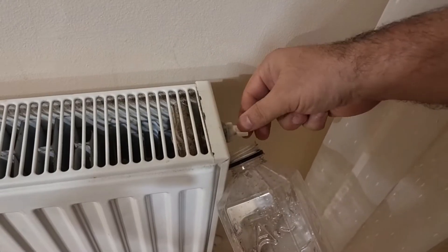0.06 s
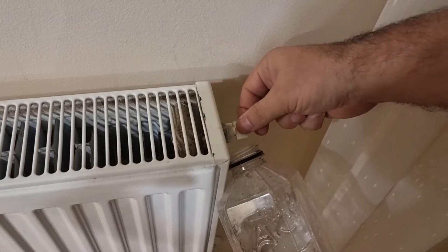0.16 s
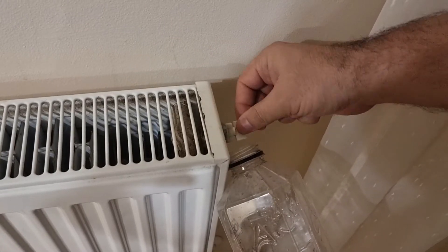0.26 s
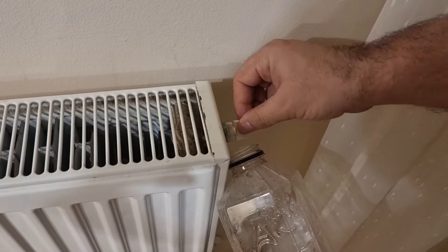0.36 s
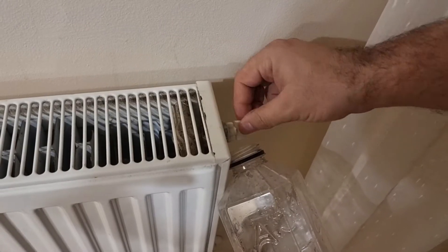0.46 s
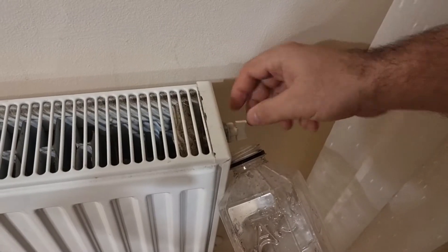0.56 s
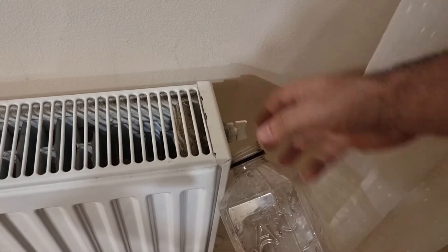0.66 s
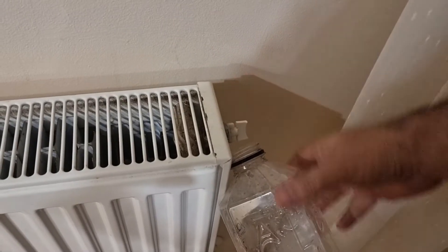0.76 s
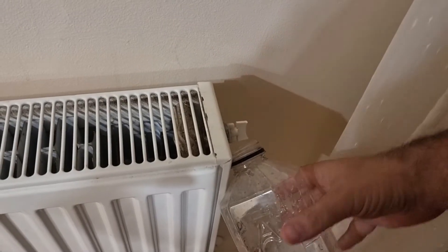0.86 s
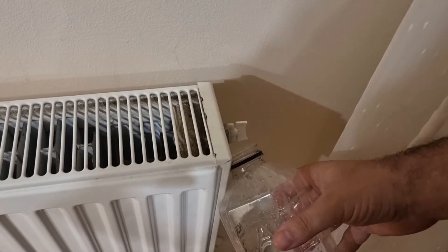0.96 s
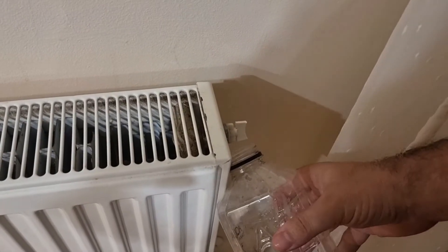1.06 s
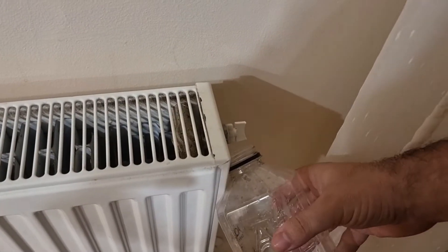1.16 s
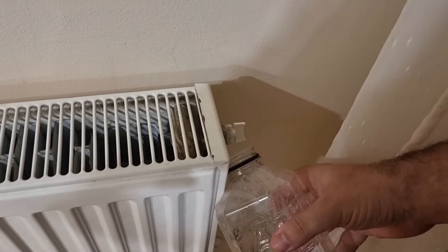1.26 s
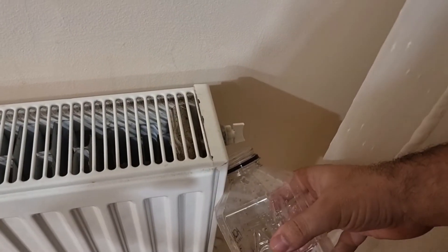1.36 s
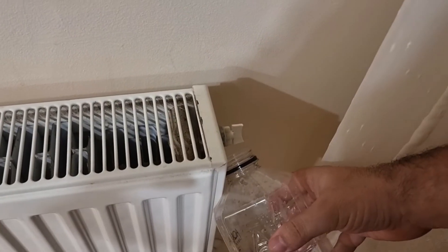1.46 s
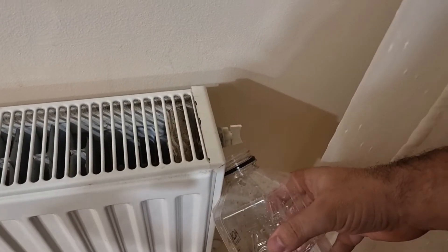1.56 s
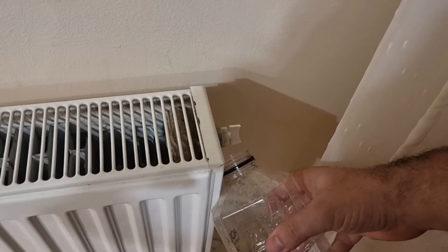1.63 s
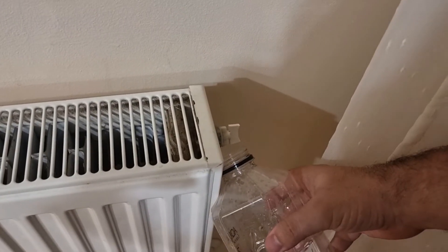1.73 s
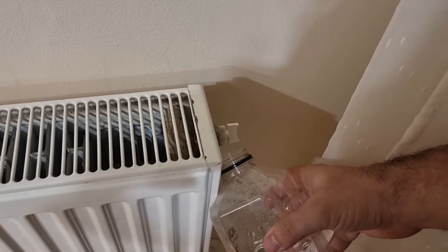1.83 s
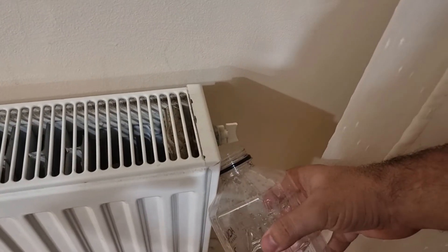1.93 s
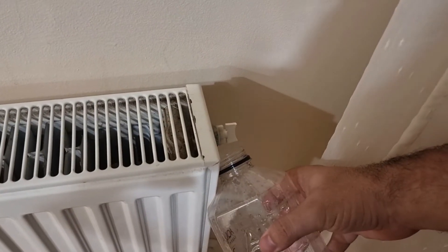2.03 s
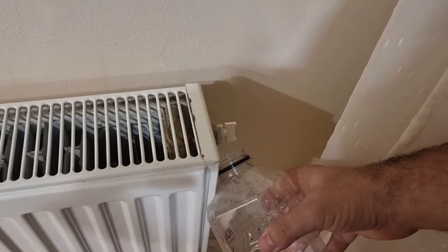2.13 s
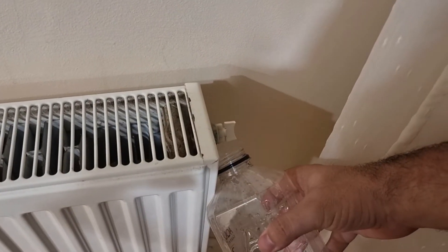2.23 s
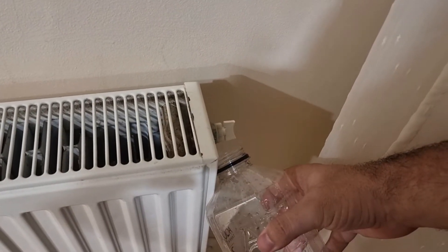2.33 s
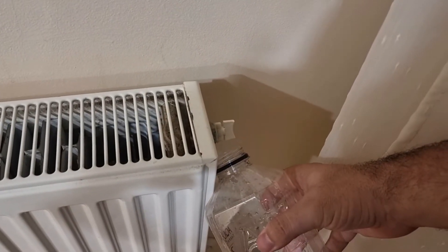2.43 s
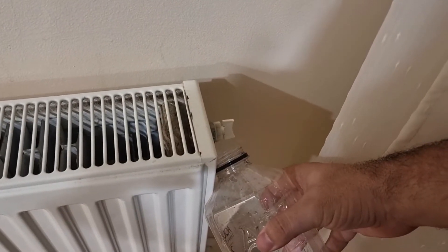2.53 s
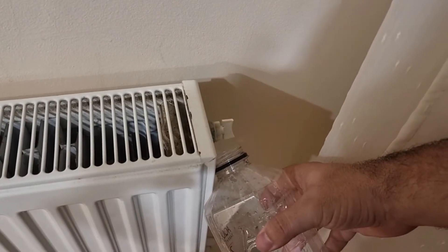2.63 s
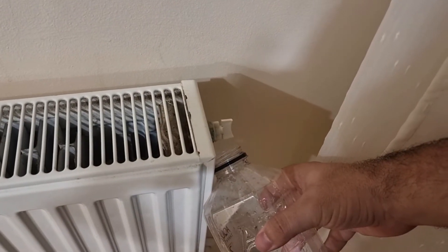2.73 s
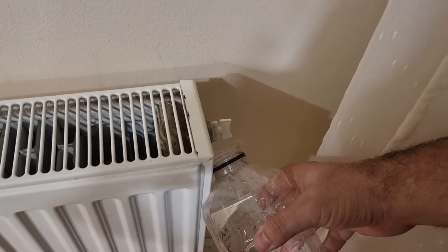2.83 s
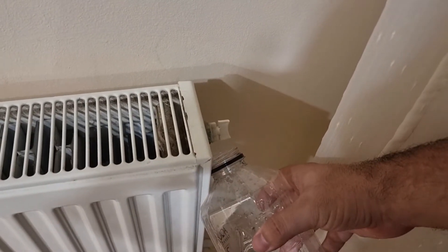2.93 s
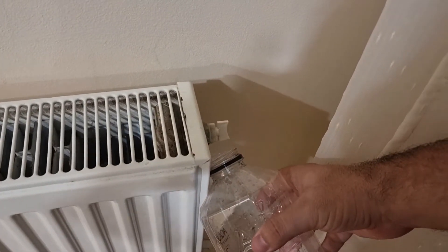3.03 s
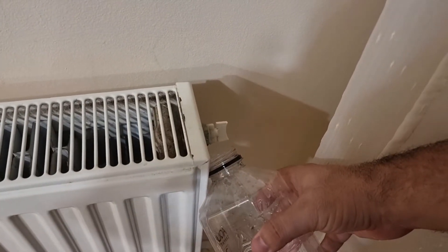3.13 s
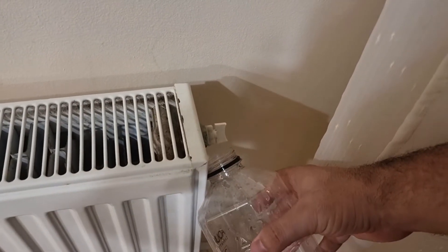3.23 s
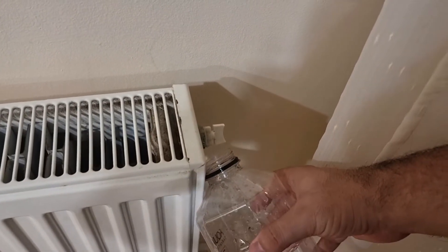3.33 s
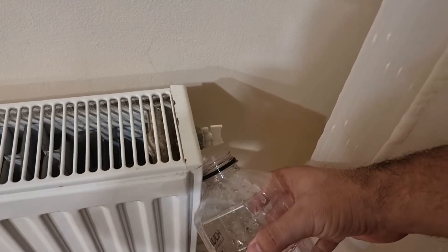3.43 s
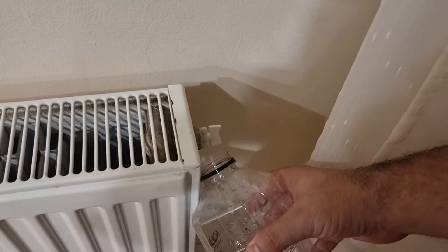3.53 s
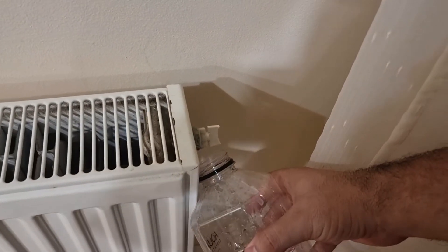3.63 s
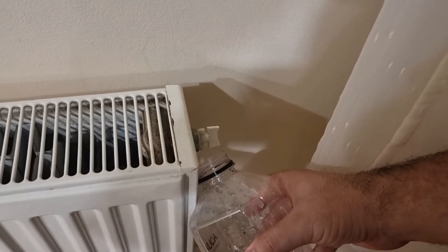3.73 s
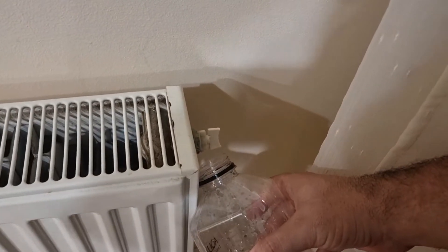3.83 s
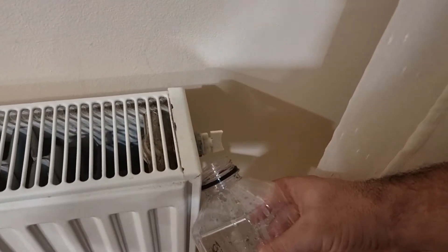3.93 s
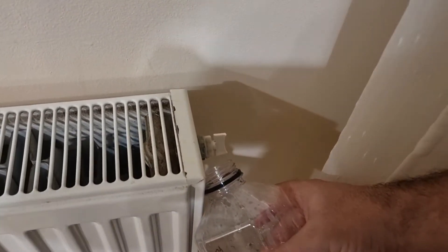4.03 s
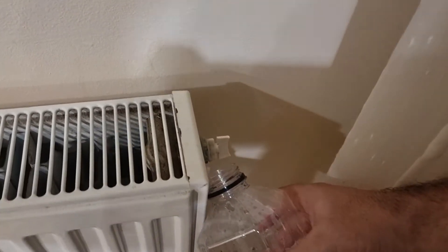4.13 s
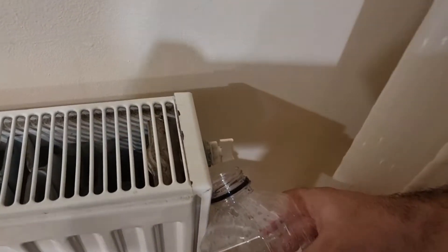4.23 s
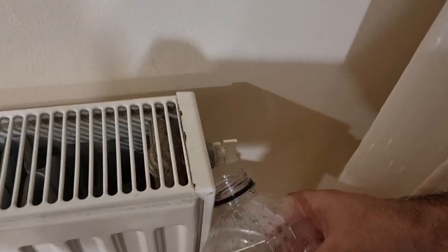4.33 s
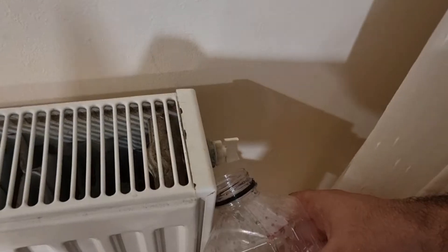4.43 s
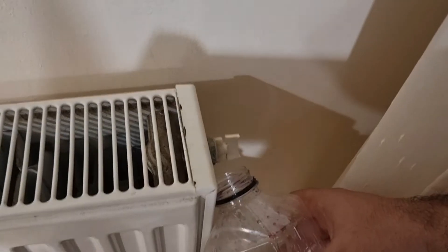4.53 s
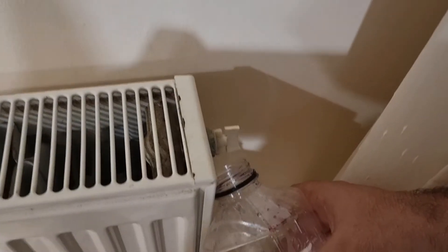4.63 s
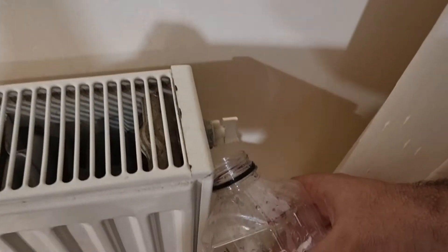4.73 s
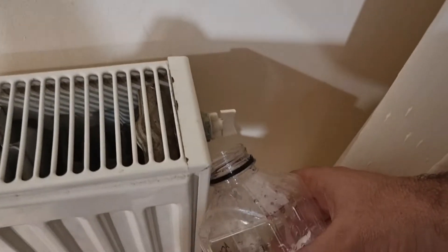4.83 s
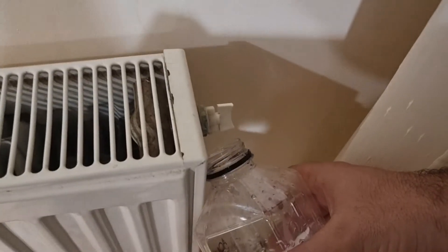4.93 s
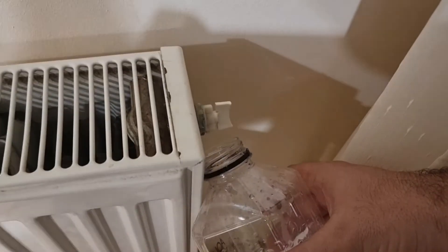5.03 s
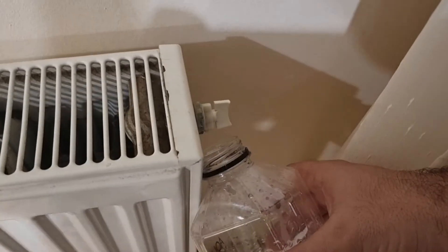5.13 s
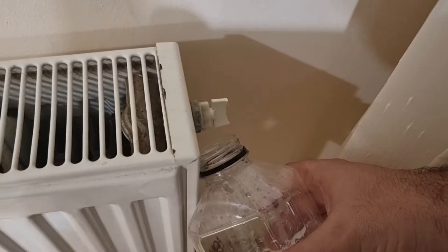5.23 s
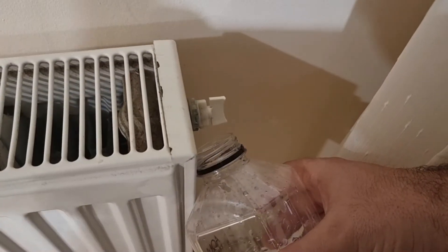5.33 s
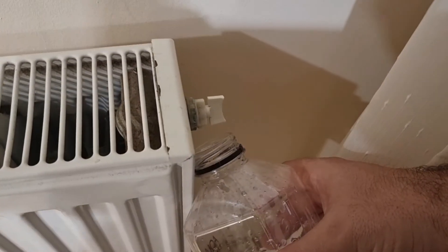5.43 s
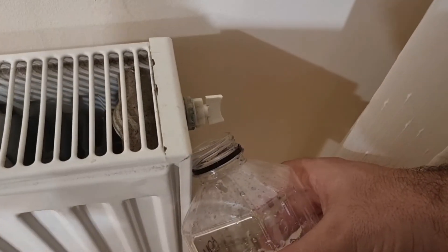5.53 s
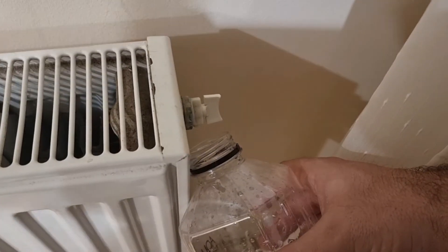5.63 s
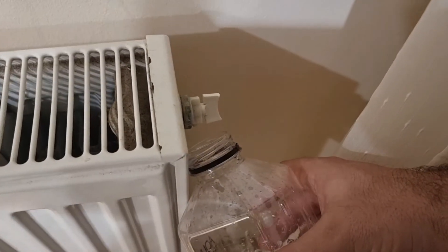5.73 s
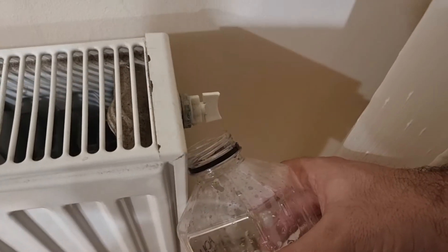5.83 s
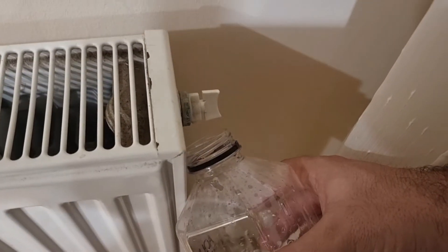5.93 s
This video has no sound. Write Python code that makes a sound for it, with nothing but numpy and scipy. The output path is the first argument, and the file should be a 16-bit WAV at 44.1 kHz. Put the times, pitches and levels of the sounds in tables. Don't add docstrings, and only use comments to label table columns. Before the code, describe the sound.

A bright, uneven hiss of escaping air beside a radiator, with brief hollow plastic knocks near one second and soft handling creaks.

```python
import sys
import numpy as np
from scipy import signal
from scipy.fft import rfft, irfft, next_fast_len
from scipy.io import wavfile

SR = 44100
rng = np.random.default_rng(int(sys.argv[2]) if len(sys.argv) > 2 else 0)


def inscribe(sig):
    pcm = np.round(np.clip(np.atleast_2d(sig).T, -1, 1) * 32767)
    wavfile.write(sys.argv[1], SR, pcm.astype(np.int16))


def level_to_linear(level):
    exponent = np.asarray(level, float) / 20
    return 10 ** exponent


N = 263718
SIZE = next_fast_len(N)
HZ = np.maximum(np.arange(SIZE // 2 + 1) * SR / SIZE, 1)


def rms_one(x):
    return x / np.sqrt(np.mean(x ** 2, axis=-1, keepdims=True) + 1e-20)


def in_time(rows, outside=None):
    s, *columns = np.transpose(rows)
    return [np.interp(np.arange(N) / SR, s, c, outside, outside) for c in columns]


def at_hz(points, axis=1):
    points = np.array(points)
    return np.interp(np.log(HZ), np.log(np.maximum(points[:, 0], 1)), points[:, axis])


def white(count):
    return rfft(rng.standard_normal((count, SIZE)))


def drift(rate):
    r = np.exp(-80 * np.pi * rate / SR)
    noise = rng.standard_normal(N // 40 + 2002)
    slow = signal.lfilter([1], [1, -2 * r, r * r], noise)[2000:]
    return np.interp(np.arange(N) / 40, np.arange(len(slow)), rms_one(slow))


def ring(hz, t60, length):
    t = np.arange(length) / SR
    return np.sin(2 * np.pi * hz * t) * level_to_linear(-60 * t / t60)


def add(out, sound, s):
    at = round(s * SR)
    out[..., at:at + sound.shape[-1]] += sound[..., :N - at]


def lean(left_over_right_db):
    return level_to_linear([[left_over_right_db / 2], [-left_over_right_db / 2]])


def scattered(source, t60, count=12):
    hold, t = N // count + 1, np.arange(SR // 5) / SR
    tails = rng.standard_normal((count + 2, 2, len(t))) * level_to_linear(-60 * t / t60)
    tails = rms_one(tails) / np.sqrt(len(t))
    fade = np.sin(np.pi * np.arange(2 * hold) / (2 * hold))
    out = np.zeros((2, SIZE + 3 * hold + len(t)))
    source = np.tile(source, 2)
    for k, tail in enumerate(tails[:count + 1]):
        piece = source[k * hold:(k + 2) * hold] * fade
        add_at = slice(k * hold, (k + 2) * hold + len(t) - 1)
        out[:, add_at] += signal.fftconvolve(piece[None], tail, axes=1)
    return rfft(out[:, hold:hold + SIZE]), rfft(source[hold:hold + SIZE])


def panel_comb():
    # (centre [Hz], half width [Hz], delay [ms], strength [-1..1])
    panel_echoes = [(4358, 571, 2.322, 0.52), (6194, 336, 2.31, -0.4), (8240, 893, 2.327, 0.37),
                    (13001, 200, 4.603, -0.25)]
    comb = np.ones(len(HZ))
    for hz, half_width, ms, strength in panel_echoes:
        reach = ((HZ - hz) / half_width) ** 2
        comb = comb * abs(1 - strength * np.exp(-reach - 2j * np.pi * HZ * ms / 1000))
    return comb


def jet_levels():
    # (time [s], level [dB])
    aim = [(0, 0.5), (.3, 1.5), (.83, 2), (.88, -2.5), (1.0, 2), (1.35, 1.5), (1.65, -1), (1.9, 0),
           (2.42, 2.5), (2.6, -0.5), (3.16, -0.5), (3.5, 1.5), (3.9, -2.5), (4.2, 0), (4.75, 1), (5.2, 0.5),
           (5.98, 2)]
    aim_share = [0.067, 0.05, 0.36, 1.0]
    key_turn_s = (.33, .42)
    key_turn_db = [-1.5, -3.5, -2, -0.2]
    (aim_db,) = in_time(aim)
    before = np.interp(np.arange(N) / SR, key_turn_s, [1, 0])
    return [level_to_linear(felt * aim_db + db * before + 1.0 * drift(7.0))
            for felt, db in zip(aim_share, key_turn_db)]


def jet(skirt_db=-19.5, depth=0.96, blur=0.16):
    jet_edges_hz = [1000, 3400, 7600, 11500, 17000]
    # (from [s], to [s])
    moves = [
        (1.0, 1.62),
        (2.32, 2.68),
        (4.0, 4.41),
    ]
    # (frequency [Hz], left [dB per Hz], right [dB per Hz])
    colour = [
        [(1560, -88, -87.5), (2030, -74.5, -81), (4170, -63.5, -59.5), (6560, -76.5, -70), (7700, -90.5, -83),
         (10850, -75, -73), (13100, -71.5, -64), (15700, -61.5, -70)],
        [(1520, -95.5, -90), (2050, -81.5, -84.5), (3820, -74, -71), (6520, -78, -67.5), (7560, -84, -78.5),
         (10800, -81, -79), (12850, -69, -58.5), (15700, -64, -72)],
        [(1500, -93.5, -87.5), (2060, -86.5, -89), (3920, -69, -67.5), (6640, -76, -66.5), (7600, -87.5, -82),
         (10500, -84, -82.5), (12900, -71.5, -62.5), (15700, -67, -73)],
        [(1520, -97, -88.2), (2030, -82, -86.2), (4210, -73, -64), (6420, -75.5, -71.5), (8000, -83.6, -79.5),
         (10800, -82, -85), (13240, -80, -85), (15800, -70, -76.6)],
    ]
    # (centre [Hz], width [Hz], boost or cut [dB])
    fin_rings = [
        [(2380, 520, -6.7), (2730, 80, -5.7), (3210, 120, -4.5), (4030, 900, -7.1), (6280, 60, 4.5),
         (7130, 900, 5.8), (8140, 80, 5.4), (8550, 140, 5.6), (8950, 80, 5.3), (11190, 900, -4.2)],
        [(1850, 110, -4.2), (2430, 70, 5.1), (3910, 120, -9.6), (4140, 140, 4.8), (4860, 660, 4.5),
         (8230, 300, -3.9), (12500, 130, -5.7), (12880, 60, -5.7), (13660, 170, -5.4), (14340, 700, -5.0)],
        [(1870, 60, -2.5), (2340, 330, 4.0), (3830, 120, -6.5), (4460, 120, -4.8), (5060, 60, -4.5),
         (5590, 60, -4.4), (8230, 80, 4.0), (11840, 130, 4.1), (12480, 110, -6.4), (13970, 900, -6.0)],
        [(2450, 350, 7.8), (2630, 470, -6.2), (4550, 80, -4.9), (5040, 60, -3.5), (6290, 60, 5.1),
         (7610, 900, -2.8), (8090, 260, -5.0), (12030, 540, 5.5), (13040, 610, 4.8), (14280, 180, 4.5)],
    ]
    # (frequency [Hz], phase [rad])
    port_lead = [
        [(0, 15), (1210, 3.5), (3450, -5.5), (6890, -26.5), (8960, -34), (12200, -29), (16500, -31)],
        [(0, 5), (1460, 2), (5000, -7.5), (7150, -0.5), (11200, -23.5), (13400, -35.5), (16500, -26)],
        [(0, 3.5), (1980, -13), (6200, -17.5), (9300, -32.5), (11800, -24.5), (13800, -36), (16500, -34.5)],
        [(0, 2), (1810, 0.5), (7670, -8.5), (8530, -13.5), (11800, -15.5), (13000, -17), (16500, -27)],
    ]
    # (frequency [Hz], share [0-1])
    direct = [(1500, 0.38), (2100, 0.89), (3500, 0.12), (4700, 0.67), (5800, 0), (8000, 0.56),
              (11000, 0.07), (13500, 0.83), (15300, 0.6)]
    # (centre [Hz], width [Hz], boost or cut [dB])
    panel_rings = [(1780, 80, 4.2), (2060, 300, 8.0), (2700, 220, 7.6), (3400, 90, -4.7), (3980, 900, -7.5),
                   (4820, 160, -5.3), (5290, 140, -5.0), (5840, 870, -5.4), (9180, 720, 3.5),
                   (11420, 90, 3.8), (12080, 220, -5.2), (13870, 220, 5.6), (15600, 260, -3.9)]

    echoes, shared = scattered(rng.standard_normal(SIZE), t60=0.075)
    echoes = np.sqrt(1 - blur) * echoes + np.sqrt(blur) * white(count=2)
    share = np.clip(at_hz(direct), 0, 1)
    skirt = skirt_db * np.maximum(np.log2(1500 / HZ), 0)
    comb = panel_comb() ** depth
    levels = jet_levels()
    t = np.arange(N) / SR
    arrived = [1] + [np.interp(t, move, [0, 1]) for move in moves] + [0]
    out = np.zeros((2, N))
    for k in range(4):
        rings_db = sum(db / (1 + (2 * (HZ - hz) / width) ** 2)
                       for hz, width, db in panel_rings + fin_rings[k])
        colour_db = np.array([at_hz(colour[k], axis=1), at_hz(colour[k], axis=2)])
        turn = np.exp(1j * np.interp(HZ, *np.transpose(port_lead[k])))
        ports = np.sqrt(share) * shared * [turn, np.ones(len(HZ))] + np.sqrt(1 - share) * echoes
        ports = ports * comb * level_to_linear(colour_db + rings_db + skirt) * np.sqrt(SR / 2)
        here = arrived[k] - arrived[k + 1]
        for gain, low, high in zip(levels, jet_edges_hz, jet_edges_hz[1:]):
            band = irfft(ports * ((HZ >= low) & (HZ < high)), SIZE)[:, :N]
            out += here * gain * band
    return out


def room_tone(patchy_db=1.4):
    # (frequency [Hz], likeness [-1..1])
    room_alike = [(50, 0.55), (130, 0.86), (300, 0.31), (640, 0.021), (1400, 0.048)]
    # (frequency [Hz], level [dB per Hz])
    room_colour = [(21, -31), (35, -1), (60, -4), (75, -9.5), (107, -21.5), (168, -21.5), (213, -23.5),
                   (231, -27.5), (302, -20.5), (422, -30), (600, -28.5), (810, -24.5), (1130, -29),
                   (1270, -28), (1900, -55.5), (2470, -50), (4180, -120)]
    # (time [s], level [dB])
    room_level = [(0, -59.5), (2, -58.5), (4, -59), (5, -57.5), (6, -58.5)]
    mid, side = white(count=2)
    alike = np.clip(at_hz(room_alike), -1, 1)
    both = np.sqrt(1 + alike) * mid + np.sqrt(1 - alike) * side * [[1], [-1]]
    spectrum = both * level_to_linear(at_hz(room_colour)) * (HZ > 64) * (HZ < 1900)
    air = rms_one(irfft(spectrum, SIZE)[:, :N])
    return air * level_to_linear(in_time(room_level)[0] + patchy_db * drift(2.5)) * lean(-1.5)


def motor(hum_hz=48.7, in_step_s=4.72):
    # (time [s], frequency [Hz])
    motor_hz = [(0, 53.9), (1.2, 53.4), (2.0, 52.6), (3.4, 50.4), (5.98, 50.4)]
    # (time [s], level [dB])
    motor_level = [(0, -81), (.7, -61.5), (1.4, -57), (3.4, -54), (5.98, -51.5)]
    # (time [s], level [dB])
    hum_level = [(0, -69), (.7, -61), (2, -75.5), (5.98, -64.5)]
    (hz,), (db,), (hum_db,) = in_time(motor_hz), in_time(motor_level), in_time(hum_level)
    hum = 2 * np.pi * hum_hz * np.arange(N) / SR
    slip = 2 * np.pi * np.cumsum(hz - hum_hz) / SR
    slip = slip - slip[round(in_step_s * SR)]
    tone = level_to_linear(db) * np.sin(hum + slip) + level_to_linear(hum_db) * np.sin(hum)
    return np.sqrt(2) * tone * lean(-3.0)


def bottle_rub():
    # (frequency [Hz], level [dB per Hz])
    rub_colour = [(120, -49), (200, -20), (258, -19), (307, -0.5), (409, -15.5), (536, -11), (784, -44),
                  (838, -14), (1180, -8), (1500, -19), (1950, -49), (3300, -120)]
    # (time [s], level [dB])
    rub_level = [
        (0.33, -61),
        (0.466, -54),
        (0.718, -67),
        (0.772, -64),
        (0.85, -61),
    ]
    spectrum = white(count=2) * level_to_linear(at_hz(rub_colour)) * (HZ < 1700)
    rub = rms_one(irfft(spectrum, SIZE)[:, :N])
    return rub * level_to_linear(in_time(rub_level, -120)[0] + 2.0) * lean(-3.0)


def bottle_knocks(rise_cycles=0.56):
    # (frequency [Hz], level [dB], t60 [s])
    modes = [(161, -15, 0.087), (221, -4.5, 0.074), (286.4, -0.5, 0.11), (311, 2, 0.12), (347, -7, 0.063),
             (460, 5.5, 0.031), (560, -3.5, 0.075), (684, -13.5, 0.039), (820, -9.5, 0.059),
             (1110, -14, 0.052), (1200, -15, 0.051), (1235, -13, 0.096), (1550, -17, 0.039),
             (2140, -1.5, 0.026)]
    # (time [s], peak [dB], brightness [dB per octave], damping [times])
    knocks = [
        (.76, -53, 7.5, 0.81),
        (0.973, -36.5, 1.5, 2.2),
        (0.988, -32.5, -0.5, 2.2),
        (1.07, -49, -1, 0.76),
        (1.11, -24.5, 2, 2.8),
        (1.115, -24.5, -3, 1.23),
        (1.482, -53, 3, 1.2),
        (4.711, -52, 6.5, 1.34),
    ]
    out, t = np.zeros((2, N)), np.arange(SR // 4) / SR
    mix = rng.normal(0, 1, (len(knocks), len(modes), 2, 2, 1))
    for (s, db, bright_db, damping), own in zip(knocks, mix):
        for (hz, mode_db, t60), (gain, turn) in zip(modes, own):
            height_db = db - 0.5 + mode_db + bright_db * np.log2(hz / 330)
            height_db = height_db + 2.0 * gain + [[-2.5], [2.5]]
            swell = (1 - np.exp(-t * hz / rise_cycles)) ** 2
            decay = level_to_linear(-60 * t * max(damping, .2) / t60)
            tone = np.sin(2 * np.pi * hz * t + turn * min(hz / 900, 3))
            add(out, level_to_linear(height_db) * swell * decay * tone, s)
    return out


def corner(x, t60=0.39, wet_db=-5.5):
    t = np.arange(SR // 2) / SR
    tail = rng.standard_normal((2, SR // 2)) * level_to_linear(-60 * t / t60) * (t > .006)
    tail = tail / np.sqrt(np.sum(tail ** 2, axis=1, keepdims=True))
    return x + level_to_linear(wet_db) * signal.fftconvolve(x, tail, axes=1)[:, :N]


def creaks():
    # (time [s], peak [dB], left minus right [dB], pulse [Hz])
    grips = [
        (0.343, -42, -16, 305),
        (2.638, -40, -16, 300),
        (2.859, -46, -2, 300),
        (3.075, -44, -12, 300),
        (3.109, -52, -6, 306),
        (4.099, -43, -12, 300),
        (4.339, -49, -19, 299.5),
        (4.374, -35.5, -9, 302),
        (4.889, -55, -11, 300),
        (5.922, -35.5, -15.5, 298),
    ]
    out = np.zeros((2, N))
    for s, db, lean_db, hz in grips:
        thump = level_to_linear(-4.5) * ring(70, 0.067, SR // 8)
        pulse = ring(hz, 1.5 / hz, SR // 8) + thump
        sides = lean(lean_db) * [[-1], [1]]
        add(out, level_to_linear(db + 1.5) * pulse * sides, s + 0.00454)
    return out


def hoots():
    # (time [s], length [s], frequency [Hz], level [dB], width [Hz])
    puffs = [(0.753, 0.021, 1200, -52, 5), (0.965, 0.051, 75, -44.5, 3.3), (1.065, 0.023, 1407, -47, 1.6),
             (1.53, 0.12, 202, -56.5, 28), (2.4, 6.5, 803, -70.5, 74), (3.477, .24, 916, -62.5, 18),
             (3.926, 0.14, 890, -66, 12.4), (4.48, 0.13, 809, -64, 12), (5.262, 0.11, 563, -56, 1.5),
             (5.351, 0.12, 568, -59, 2.1), (5.66, 0.094, 560, -66, 6.6), (5.821, 0.044, 560, -64, 6)]
    out, breath = np.zeros(N), white(count=1)[0]
    for s, length, hz, db, width_hz in puffs:
        resonance = 1 / (1 + (2 * (HZ - hz) / width_hz) ** 2)
        tone = rms_one(irfft(breath * resonance, SIZE)[:round(length * SR)])
        add(out, level_to_linear(db) * tone * np.sin(np.linspace(0, np.pi, len(tone))), s)
    return out * [[.8], [1.1]]


def scene():
    bottle = corner(bottle_rub() + bottle_knocks())
    return jet() + room_tone() + motor() + bottle + creaks() + hoots()


def band_limit(x):
    return signal.sosfilt(signal.butter(12, 15900, fs=SR, output="sos"), x)


def record(dry):
    cut = irfft(rfft(dry, SIZE) * (HZ < 15745), SIZE)[:, :N]
    return band_limit(cut)


dry = scene()
out = record(dry)
inscribe(out)
```